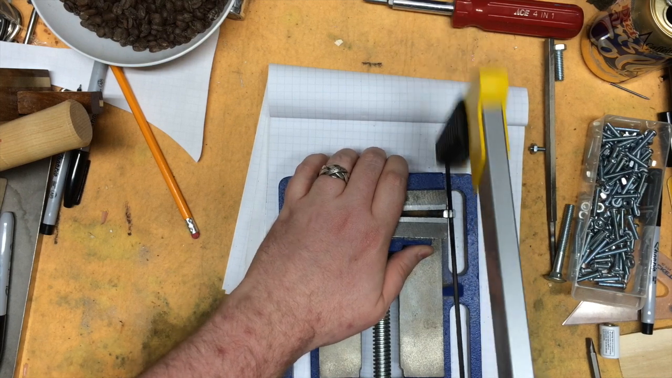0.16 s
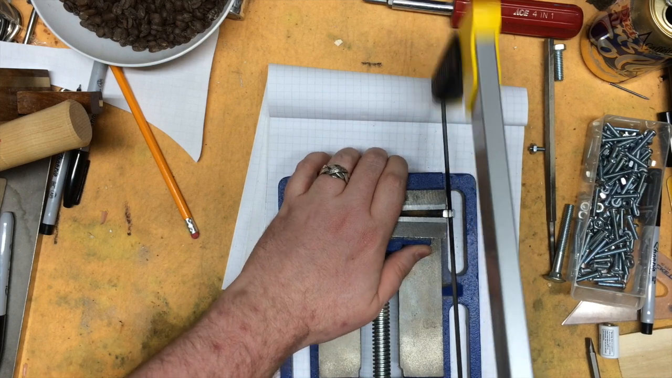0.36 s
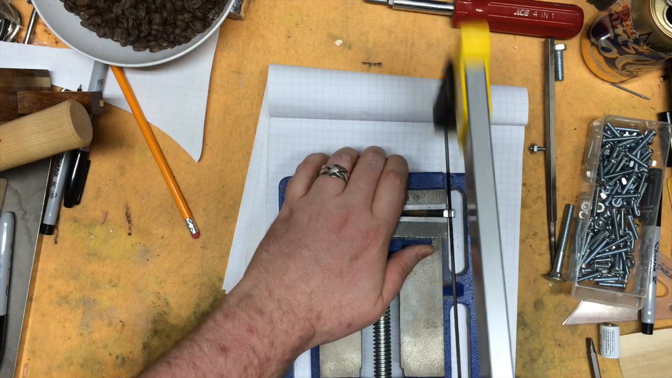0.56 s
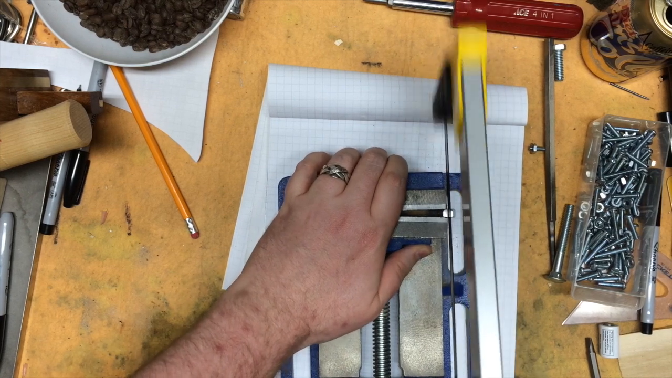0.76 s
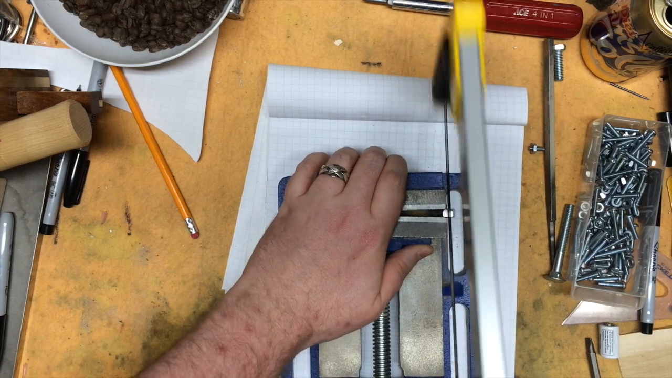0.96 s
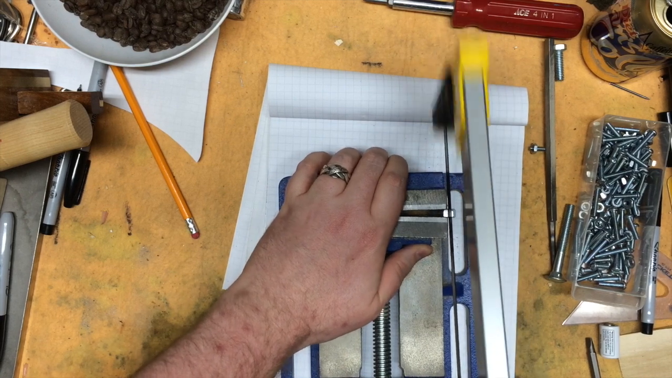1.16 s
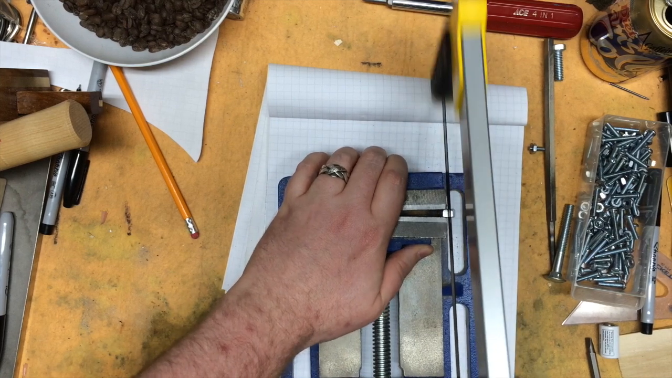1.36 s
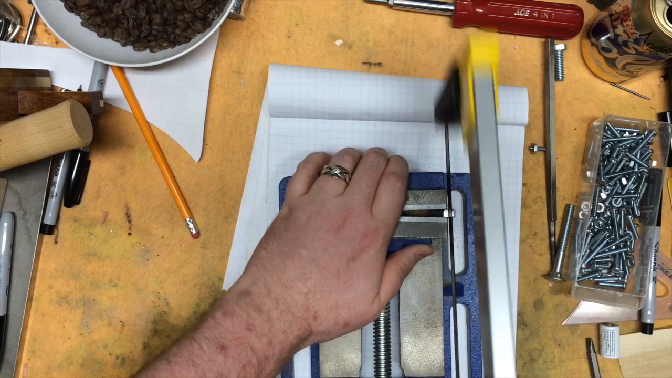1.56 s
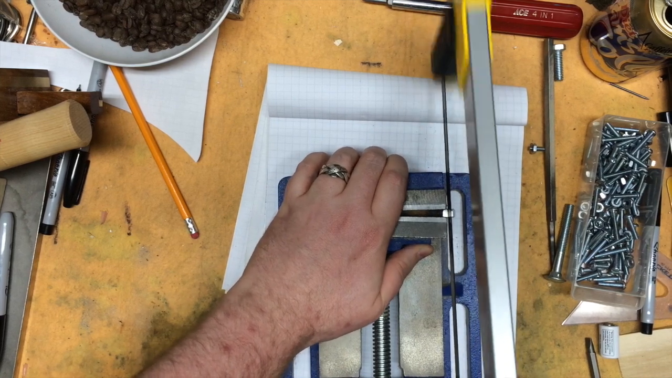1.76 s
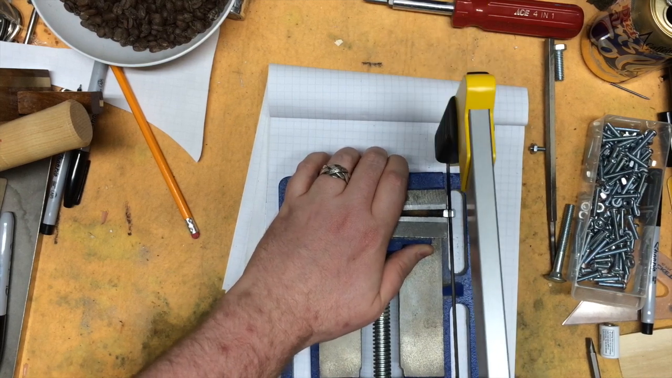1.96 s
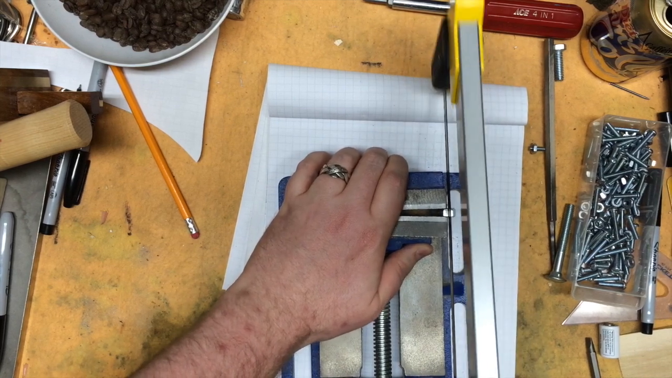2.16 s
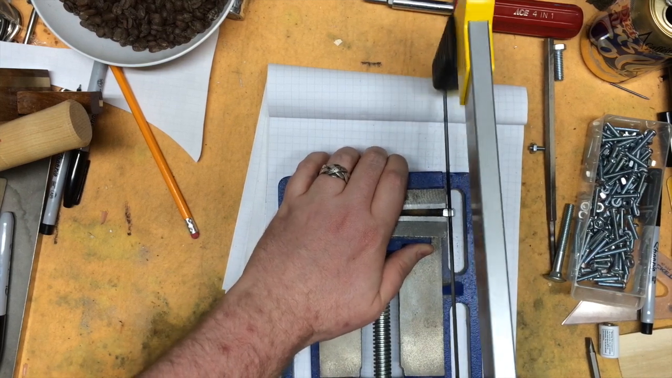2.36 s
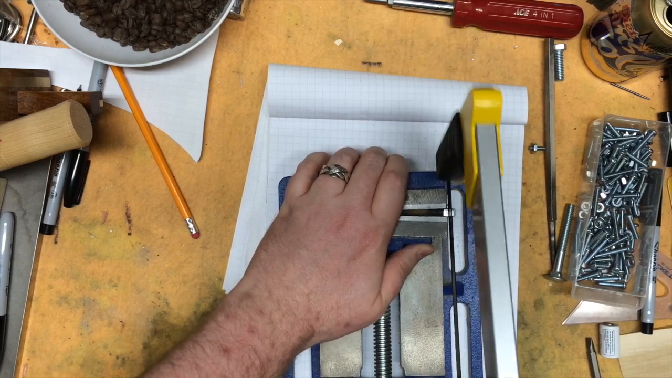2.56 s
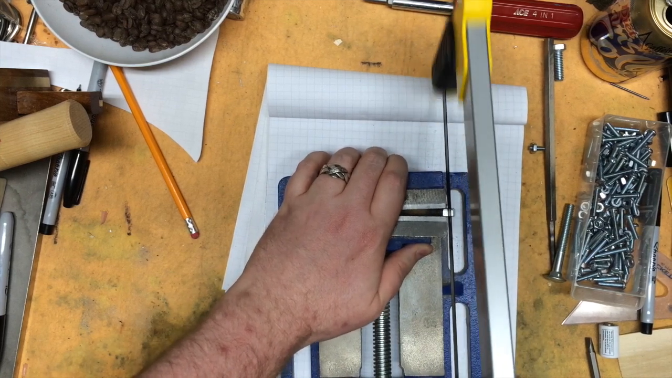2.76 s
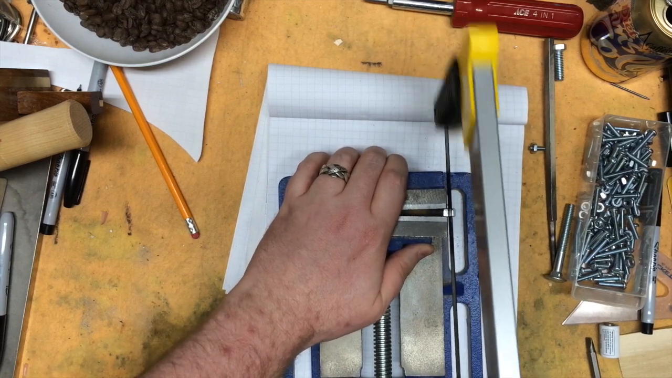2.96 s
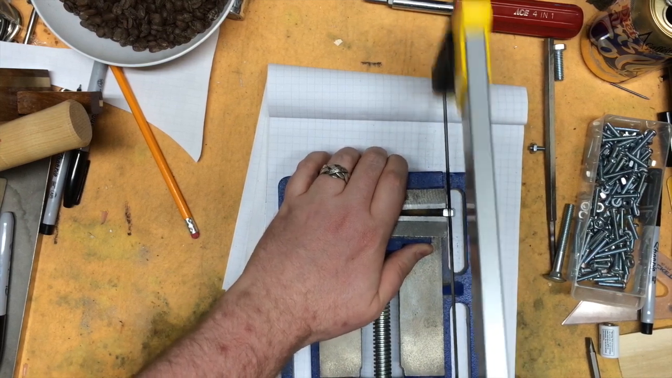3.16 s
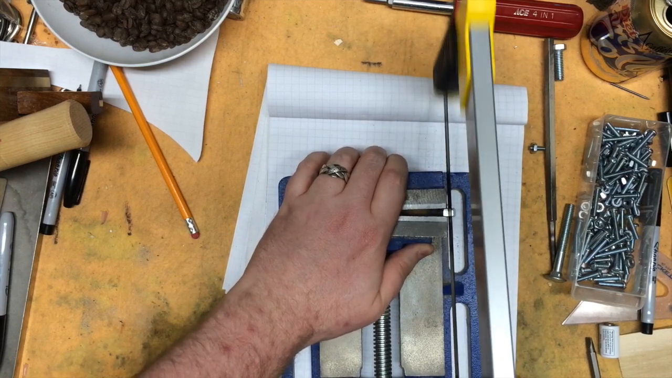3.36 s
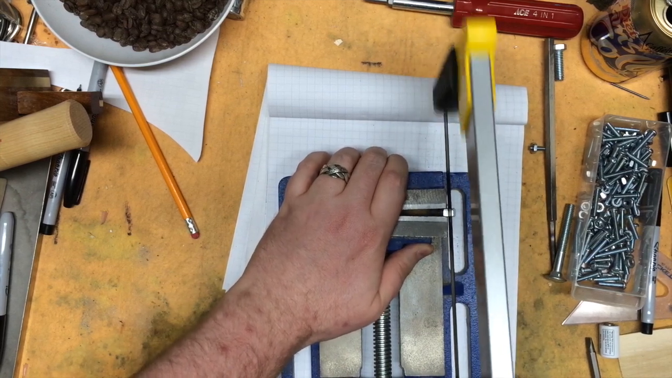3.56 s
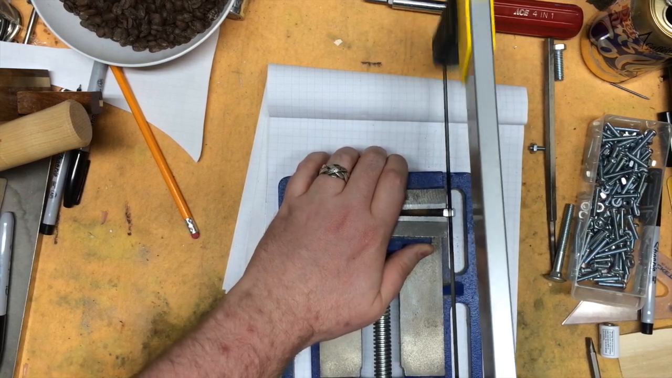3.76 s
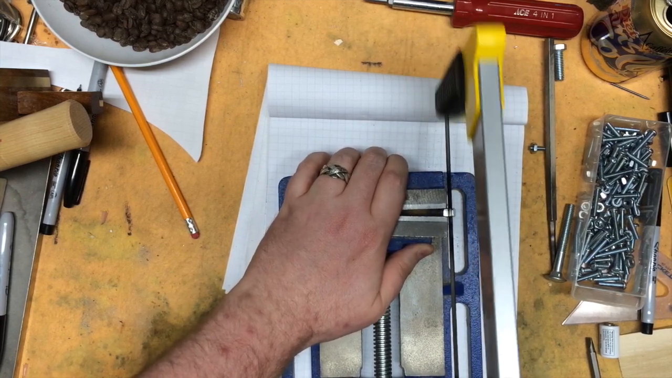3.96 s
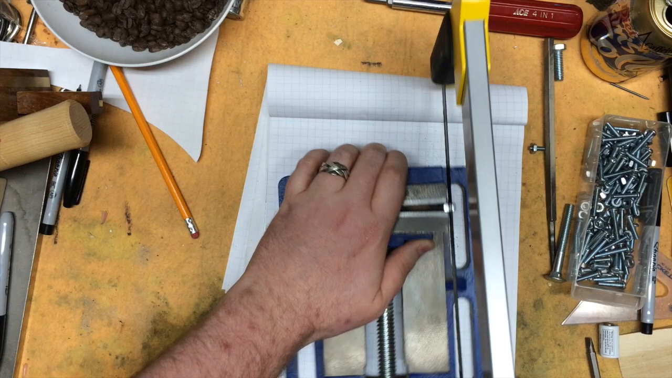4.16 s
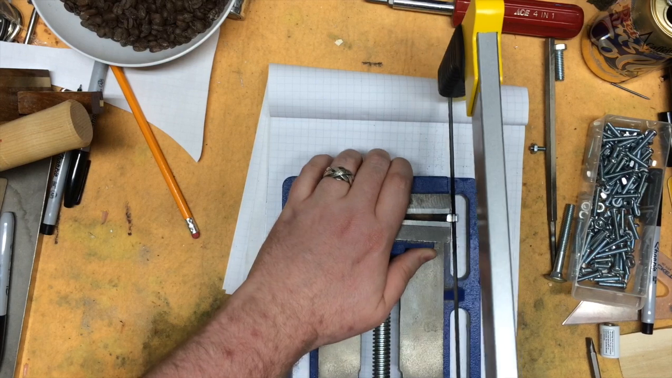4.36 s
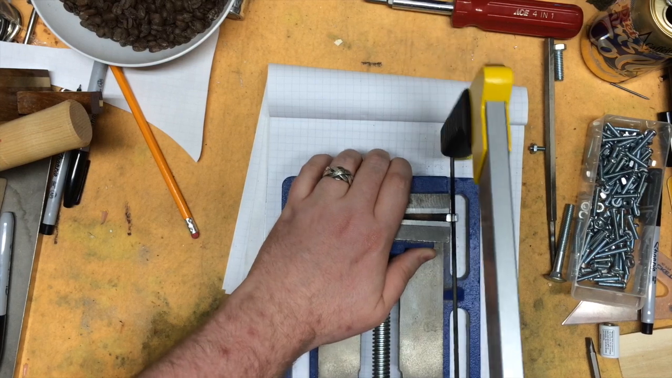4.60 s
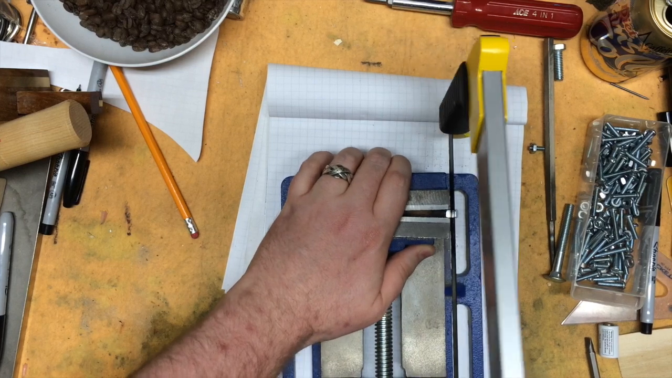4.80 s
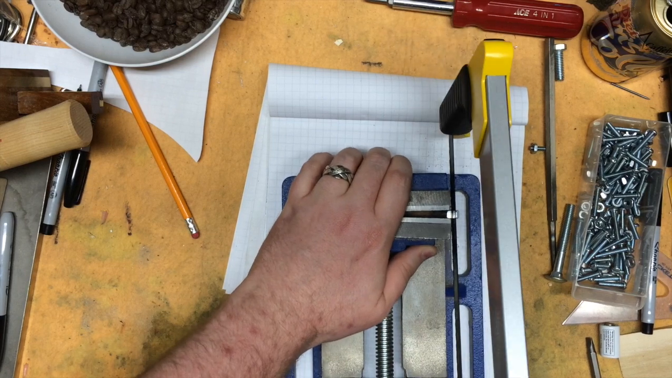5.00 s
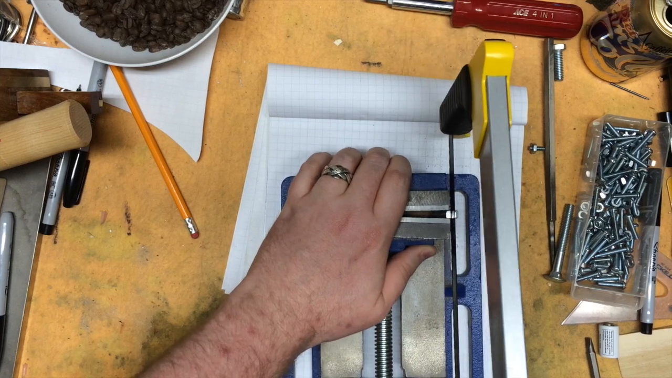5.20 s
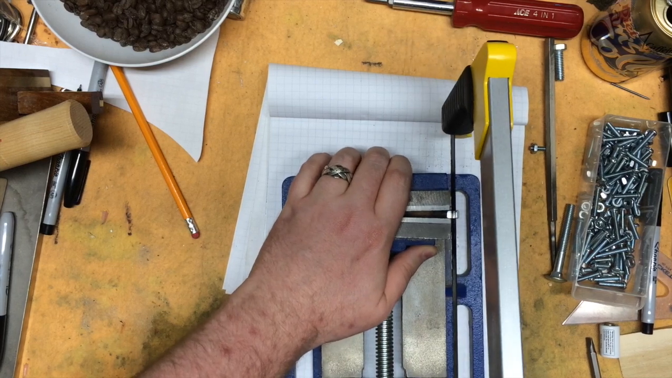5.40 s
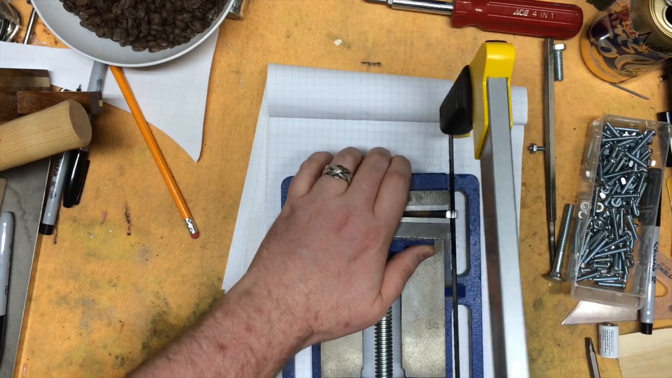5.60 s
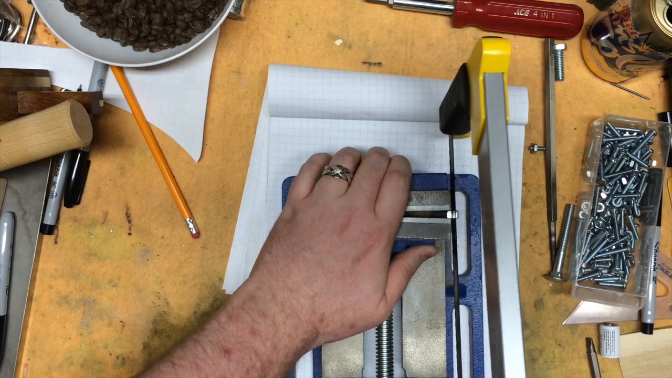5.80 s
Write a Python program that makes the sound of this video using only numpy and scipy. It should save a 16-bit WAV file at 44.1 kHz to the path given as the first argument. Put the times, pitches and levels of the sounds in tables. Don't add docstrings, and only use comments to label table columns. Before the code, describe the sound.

Fast back-and-forth metal sawing, bright and gritty with gliding ringing tones and low bench thuds, ends with a knock, blade chatter and faint taps.

```python
import sys
import numpy as np
from scipy import signal
from scipy.fft import rfft, irfft, next_fast_len
from scipy.io import wavfile
from scipy.ndimage import uniform_filter1d

SR = 44100
rng = np.random.default_rng(int(sys.argv[2]) if len(sys.argv) > 2 else 0)


def materialize(psi):
    bounded = np.clip(np.atleast_2d(psi).T, -1, 1)
    quanta = np.round(bounded * 32767).astype(np.int16)
    wavfile.write(sys.argv[1], SR, quanta)


def amplitude_ratio(level_db):
    exponent = np.asarray(level_db, float) / 20
    return 10 ** exponent


N = 257499


def evened(x):
    return x / np.sqrt(np.mean(x ** 2) + 1e-20)


def steadied(x, share=.6):
    slow_power = uniform_filter1d(x ** 2, size=1300) + 0.017
    return evened(x / slow_power ** (share / 2))


def noise():
    return rng.standard_normal(N)


def seconds():
    return np.arange(N) / SR


def read(points, hz):
    f, value = np.transpose(points)
    return np.interp(np.log(hz + 1), np.log(f + 1), value)


def add(mix, start_s, sound):
    part = mix[max(round(start_s * SR), 0):][:len(sound)]
    part += sound[:len(part)]


def resonate(x, hz, width):
    r = np.exp(-np.pi * width / SR)
    if np.ndim(hz) == 0:
        return 2 * signal.lfilter([1 - r], [1, -r * np.exp(2j * np.pi * hz / SR)], x).real
    turn = np.exp(2j * np.pi * np.cumsum(hz) / SR)
    return 2 * (turn * signal.lfilter([1 - r], [1, -r], x / turn)).real


def ring(x, modes):
    total = 0
    for hz, width, db in modes:
        total = total + amplitude_ratio(db) * evened(resonate(resonate(x, hz, width), hz, 3 * width))
    return evened(total)


def colour(x, points):
    size = next_fast_len(len(x))
    gain = amplitude_ratio(read(points, np.fft.rfftfreq(size, 1 / SR)))
    return irfft(rfft(x, size) * gain, size)[:len(x)]


def flutter(hz):
    slow = signal.butter(N=2, Wn=hz, fs=SR / 16, output="sos")
    coarse = signal.sosfilt(slow, rng.standard_normal(N // 16 + 2))
    return evened(np.interp(np.arange(N) / 16, np.arange(len(coarse)), coarse))


def ping(db, hz, rise, t60):
    t = np.arange(round(.6 * SR)) / SR
    fade = amplitude_ratio(db - 60 * t / max(t60, .005))
    return fade * np.sin(2 * np.pi * hz * t) * (1 - np.exp(-t / max(rise, 1e-4)))


def swell(t, s, db, rise, fall):
    return amplitude_ratio(db - np.where(t < s, rise * (s - t), fall * (t - s)))


def held(t, rows, rise, sag, fall):
    total = 0
    for s, length, db in rows:
        total = total + swell(t, s, db, rise, sag) * swell(t, s + length, 0, 0, fall - sag)
    return total


# [teeth_bite_s, hardest_s, let_go_s, effort_db, run_up_s]
STROKES = [(0.0, 0, 0.044, -45, 0.03), (0.12, 0.193, 0.273, -34.5, 0.038), (0.374, 0.445, 0.487, -36, 0.06),
           (0.583, 0.6, 0.714, -35, 0.011), (0.837, 0.879, 0.92, -32.5, 0.083),
           (1.023, 1.045, 1.131, -32.5, 0.036), (1.229, 1.281, 1.335, -34, 0.048),
           (1.419, 1.463, 1.542, -34.5, 0.027), (1.648, 1.692, 1.752, -32.5, 0.089),
           (1.838, 1.894, 1.99, -34.5, 0.035), (2.115, 2.212, 2.255, -38.5, 0.056),
           (2.477, 2.548, 2.678, -38, 0.033), (2.728, 2.837, 2.877, -35.5, 0.035),
           (2.98, 3.03, 3.095, -37, 0.034), (3.211, 3.26, 3.32, -33.5, 0.073),
           (3.401, 3.476, 3.526, -38.5, 0.032), (3.651, 3.705, 3.761, -35, 0.064),
           (3.859, 3.88, 3.957, -35.5, 0.032), (4.068, 4.09, 4.182, -32.5, 0.046),
           (4.256, 4.31, 4.326, -43.5, 0.04), (4.512, 4.531, 4.69, -38, 0.025),
           (4.801, 4.82, 4.845, -29.5, 0.014)]
# [start_s, length_s, level_db]
VISE_RINGS = [(0.224, 0.047, -50.5), (0.38, 0.03, -52.5), (0.527, 0.008, -65.8), (0.662, 0.047, -46.5),
              (0.818, 0.0, -49.5), (1.082, 0.058, -50), (1.245, 0.052, -37.5), (1.532, 0.0011, -43.5),
              (1.635, 0.038, -46.5), (1.722, 0.031, -61), (1.952, 0.044, -46.5), (2.1, 0.12, -54.5),
              (2.54, 0.12, -41.5), (2.74, 0.068, -44.5), (3.052, 0.032, -51), (3.193, 0, -50),
              (3.467, 0.091, -56.9), (3.646, 0, -55.4), (3.935, 0.014, -51.5), (4.086, 0.037, -44),
              (4.292, 0.012, -46), (4.544, 0.12, -53)]
# [start_s, length_s, level_db]
FRAME_RINGS = [(0.016, 0.011, -51), (0.14, 0.02, -40), (0.391, 0.094, -43), (0.601, 0.002, -40.5),
               (0.82, 0.0091, -52.5), (0.878, 0.028, -41), (1.03, 0.018, -43.5), (1.219, 0.02, -48.5),
               (1.293, 0.024, -44), (1.419, 0.136, -50.5), (1.692, 0.056, -33.5), (1.848, 0.006, -43.5),
               (1.906, 0.004, -48.5), (2.131, 0.11, -46.5), (2.496, 0.19, -49.5), (2.75, 0.134, -38.5),
               (2.836, 0.024, -44), (2.985, 0.002, -48.5), (3.055, 0.004, -54), (3.095, 0.002, -45.5),
               (3.22, 0.11, -38.5), (3.422, 0.056, -41.5), (3.66, 0.12, -38), (3.709, 0.0022, -34),
               (3.875, 0.046, -41.5), (4.087, 0.02, -28.5), (4.528, 0.039, -54), (4.614, 0.053, -51)]
# [time_s, level_db]
LEAN = [
    (0, 2.5),
    (.75, 1),
    (1.3, 0),
    (2.1, 1.5),
    (2.6, -4.5),
    (3.3, -2.5),
    (4.1, -0.5),
    (4.3, -9),
    (4.6, -1.5),
]
# [time_s, foot_db, bench_top_db]
SKIDS = [
    (1.75, -37, -68.5),
    (2.11, -65.5, -46),
    (2.74, -44, -35.5),
    (2.755, -63, -39.5),
    (3.76, -48, -65),
    (4.111, -36.5, -50.5),
    (4.282, -40, -72),
    (4.81, -56, -47.5),
]


def arm():
    t = np.arange(0, N + 64, 64) / SR
    bite_db, run_up_db = -6, 25.5
    let_go_db, lift_db_per_s = -8.5, 476.5
    scrape = np.full(len(t), 1e-7)
    for bite, hardest, go, db, run_up in STROKES:
        times = [bite - 8 * run_up, bite, hardest, go, go + 1]
        levels = [bite_db - 8 * run_up_db, bite_db, 0, let_go_db, let_go_db - lift_db_per_s]
        cut = amplitude_ratio(np.interp(t, times, levels))
        drag_db, drag_db_per_s = (-17, 145) if go >= STROKES[-2][2] else (-25, 110)
        drag = swell(t, go, drag_db, 0, drag_db_per_s) * (t > go)
        scrape += amplitude_ratio(db) * np.maximum(cut, drag)
    vise = scrape * amplitude_ratio(-27.5) + held(t, VISE_RINGS, rise=501, sag=62.5, fall=449.5)
    frame_ring = scrape * amplitude_ratio(-21) + held(t, FRAME_RINGS, rise=750, sag=60, fall=600)
    effort = uniform_filter1d(scrape, size=70) / amplitude_ratio(-38)
    shake = amplitude_ratio(-44.5 + np.interp(t, *np.transpose(LEAN))) * effort ** 0.4
    rattle = amplitude_ratio(-56) * (scrape / amplitude_ratio(-40.5)) ** 0.26
    for s, foot_db, top_db in SKIDS:
        shake = shake + swell(t, s, top_db, rise=250, fall=133.5)
        rattle = rattle + swell(t, s, foot_db, rise=353.5, fall=353.5)
    stroke_times = np.ravel([(row[0], row[2]) for row in STROKES])
    pushing = np.repeat(1 - np.arange(len(STROKES)) % 2, 2)
    push = np.interp(t, stroke_times, pushing)
    curves = [np.interp(seconds(), t, 20 * np.log10(abs(c) + 1e-9))
              for c in (scrape, vise, frame_ring, shake, rattle)]
    return curves, np.interp(seconds(), t, push)


SPAN_DB = [-77, -72, -54, -71, -46.5, -49, -48.5, -74, -47.5, -49.5, -46.5, -52.5, -42, -56, -43.5, -76,
           -46, -67, -47.5, -55, -67, -80]


def span(early_s=.015, late_s=.01):
    gain, starts, ends = np.zeros(N), [], []
    for k, (bite, hardest, go, _, _) in enumerate(STROKES):
        pulling = k % 2
        last = go if pulling else min(go, hardest + .05)
        start, end = bite - early_s, last + late_s
        add(gain, start, amplitude_ratio(SPAN_DB[k]) * signal.windows.tukey(round((end - start) * SR), .7))
        starts.append(start)
        ends.append(end)
    push_then_pull_hz = (771.6, 1179, 1003.5, 744.5)
    glide_hz = np.resize(push_then_pull_hz, 2 * len(STROKES))
    return np.interp(seconds(), np.ravel([starts, ends], "F"), glide_hz), gain


def teeth(hz, jitter=.05, uneven_db=4):
    turns = np.cumsum(hz * (1 + jitter * flutter(300))) / SR
    ticks = np.diff(np.floor(turns), prepend=0)
    return evened(ticks * amplitude_ratio(uneven_db * noise()))


def patchy(x, narrow_db, wide_db):
    z = signal.stft(x, nperseg=1024, noverlap=768)[2]
    thin, broad = rng.standard_normal((z.shape[1], z.shape[0], 2)).T
    thin = evened(uniform_filter1d(uniform_filter1d(thin, size=2, axis=0), size=9, axis=1))
    broad = evened(uniform_filter1d(uniform_filter1d(broad, size=14, axis=0), size=6, axis=1))
    z = z * amplitude_ratio(narrow_db * thin + wide_db * broad)
    return signal.istft(z, nperseg=1024, noverlap=768)[1][:N]


# [pitch_hz, level_db]
SCRAPE = [(150, -45), (250, -36.5), (553, -14), (742, -15.5), (809, -2), (1080, -5), (1530, -7.5),
          (2710, 4.5), (3060, 0), (6310, -9.5), (7510, -10.5), (10600, -21.5), (15500, -21)]
# [pitch_hz, width_hz, pull_db, push_db]
BLADE = [(1390, 32, -20.5, -5.5), (2308, 29, -0.5, -23), (2515, 22, -1.5, -3), (2660, 37, 2.5, 4),
         (3110, 70, -6.5, -17.5), (3237, 20, 6, -12.5), (3510, 90, -10, -11), (3940, 140, -6.5, -20),
         (4170, 79, -5, -6), (4870, 160, -8.5, -25.5), (5636, 74, -13, -15), (5980, 61, -25.5, -19),
         (6900, 56, -12.5, -12), (7334, 180, -10.5, -7.5), (7600, 28, -4.5, -7), (8190, 12, -25.5, -3.5),
         (12600, 140, -28.5, -13.5), (13750, 450, -37.5, -20.5)]
# [time_s, peak_db, ring_hz]
CATCHES = [(0.105, -33, 1106), (0.117, -40, 1170), (0.581, -16.5, 2786), (0.796, -29.5, 3940),
           (0.874, -32, 2760), (1.0045, -27.5, 2661), (1.0251, -14.5, 2405), (1.0644, -31, 3280),
           (1.4043, -33, 2655), (1.429, -17, 2710), (1.6053, -30, 1085), (1.6725, -14, 2681),
           (1.838, -19, 1132), (1.8775, -17.5, 2787), (1.8956, -15, 3260), (2.0963, -29.5, 1094),
           (2.4457, -38.5, 1081), (2.9625, -37, 1135), (3.2377, -21.5, 1050), (3.701, -25, 1115),
           (3.863, -20.5, 2661), (4.0719, -14, 1119), (4.092, -20, 1078), (4.1324, -22, 3487),
           (4.1729, -21, 2660), (4.5099, -40, 2690), (4.8036, -21, 3500), (4.8153, -26, 2620),
           (4.9119, -30.5, 2660)]
# [time_s, treble_db, ringing_db]
BITE = [
    (0, 1, 3.5),
    (1.2, 1, 7.5),
    (2.2, 0, 1.7),
    (3.2, 1, 3),
    (3.9, -6.5, 2),
    (4.18, -4, -1.5),
    (4.29, 10, 6),
    (4.601, -3.5, -5.5),
    (4.95, -6.5, -4),
]


def blade(scrape_db, teeth_hz, push):
    chips = noise() * amplitude_ratio(0.5 * flutter(420) + 0.81 * flutter(40))
    drive = evened(chips) + 0.19 * teeth(teeth_hz)
    broad = amplitude_ratio(-2) * evened(patchy(colour(drive, SCRAPE), narrow_db=3.6, wide_db=1.7))
    force, rings = amplitude_ratio(scrape_db) * drive, np.zeros(N)
    for s, db, hz in CATCHES:
        burst_fade = amplitude_ratio(db - 14 - 60 * np.arange(1500) / SR / 0.013)
        add(force, s, burst_fade * rng.standard_normal(1500))
        add(rings, s, ping(db - 8, hz, rise=0.0015, t60=0.054))
    modes = np.zeros(N)
    for hz, width, pull_db, push_db in BLADE:
        mode_db = pull_db + (push_db - pull_db) * push + 3.0 * flutter(20)
        level = amplitude_ratio(mode_db) * np.sqrt(width / 40)
        modes += level * resonate(force, hz, width) * np.sqrt(SR / width / np.pi / 2)
    s, treble_db, ringing_db = np.transpose(BITE)
    treble_db = np.interp(seconds(), s, treble_db)
    ringing_db = np.interp(seconds(), s, ringing_db)
    loudness = np.sqrt(abs(uniform_filter1d(force ** 2, size=120)))
    steel = amplitude_ratio(ringing_db - 16) * modes + broad * loudness
    treble = colour(steel, [(6000, -27.5), (10000, -8.0)])
    return rings + steel + treble * (amplitude_ratio(treble_db) - 1)


# [pitch_hz, width_hz, level_db]
VISE = [(730.4, 40, 13.5), (751.7, 13, 9)]
# [pitch_hz, width_hz, level_db]
FRAME = [(1109.8, 32.4, 28.5), (1153, 120, 4.5), (1040, 50, 2.5), (970, 34, -9.5)]
# [multiple, width_hz, level_db]
SPAN_ORDERS = [(1, 65, 1), (.8, 39, -12.5), (3.4, 119, -18), (4.6, 160, -21.5)]


def frame(vise_db, frame_db, span_hz, span_gain):
    drive = 0.22 * teeth(span_hz) + noise()
    glide = 0
    for multiple, width, db in SPAN_ORDERS:
        hz = multiple * span_hz
        tone = steadied(resonate(resonate(drive, hz, width), hz, width))
        glide = glide + amplitude_ratio(db + 2.5 * flutter(29)) * tone
    vise = steadied(ring(drive, VISE)) * amplitude_ratio(vise_db + 2 * flutter(30))
    frame_ring = steadied(ring(drive, FRAME)) * amplitude_ratio(frame_db + 2 * flutter(27))
    return vise + frame_ring + glide * span_gain


# [pitch_hz, width_hz, level_db]
BENCH = [(66.18, 19, 1.5), (95.2, 11, 2), (119.9, 13.6, 7.5), (168.4, 22.2, 5), (187.4, 17, -4.5)]
# [pitch_hz, width_hz, level_db]
FOOT = [(260.5, 97, 0), (343.5, 190, -3.5), (504, 180, -1)]
# [time_s, peak_db, pitch_hz, t60_s]
THUMPS = [(0.147, -35, 112.5, 0.21), (0.277, -37.5, 220, 0.24), (0.373, -25, 123.4, 0.12),
          (0.585, -23, 124, 0.047), (0.728, -27.5, 202, 0.094), (0.773, -29.5, 143.6, 0.5),
          (1.017, -37, 124, 0.36), (1.149, -29.5, 189, 0.21), (1.193, -19.5, 131.7, 0.24),
          (1.331, -27.5, 191.5, 0.078), (1.55, -24, 169.7, 0.12), (1.595, -17.5, 133.7, 0.17),
          (1.74, -37, 194, 0.19), (1.992, -24.5, 170, 0.11), (2.075, -18.5, 119.9, 0.22),
          (2.222, -36, 183, 0.2), (2.651, -27, 146.3, 0.16), (2.708, -13, 127.5, 0.13),
          (2.862, -29, 118.1, 0.1), (3.158, -27, 121.9, 0.28), (3.605, -31.5, 120.3, 0.2),
          (3.753, -32.5, 149.7, 0.13), (4.032, -25.5, 130, 0.14), (4.103, -34, 132, 0.15),
          (4.269, -45, 135, 0.24), (4.699, -32, 125.1, 0.22), (4.724, -23.5, 123.3, 0.15),
          (4.803, -33, 186, 0.12)]


def bench(shake_db, rattle_db):
    booms, jolt = np.zeros(N), amplitude_ratio(shake_db - 0.5 + 3.73 * flutter(11.8))
    rise_s = .006
    for s, db, hz, t60 in THUMPS:
        add(booms, s, ping(db + 3.0, hz, rise_s, t60))
        add(booms, s, ping(db - 9.5, 1.515 * hz, rise_s, 0.34 * t60))
        add(jolt, s, abs(ping(db - 10, hz, 2 * rise_s, t60)))
    foot = ring(noise(), FOOT) * amplitude_ratio(rattle_db - 8.0 + 2.0 * flutter(21))
    return booms + uniform_filter1d(jolt, size=360) * ring(noise(), BENCH) + foot


# [pitch_hz, t60_s]
ROOM = [(200, 0.2), (1000, 0.49), (4000, 0.2), (12000, 0.11)]


def room(x):
    taps = np.zeros(SR // 2)
    at = np.arange(300, len(taps) - 20, 20)
    taps[at + rng.integers(0, 20, len(at))] = rng.choice([-1., 1.], len(at))
    hz, t, z = signal.stft(taps, SR, nperseg=256)
    fade = amplitude_ratio(-60 * t / read(ROOM, hz)[:, None])
    tail = signal.istft(z * fade, SR, nperseg=256)[1]
    return signal.fftconvolve(x, tail / np.linalg.norm(tail))[:N]


# [pitch_hz, level_db]
AIR = [(15, -24), (25, -4.5), (133, 3.5), (188, -4.5), (359, -9.5), (509, -11), (582, -13), (722, -16.5),
       (7700, -29), (9050, -28.5), (9810, -32), (10900, -25.5), (15500, -37.5)]
# [pitch_hz, width_hz, level_db]
HUM = [(62.4, 7.4, -72.5), (124, 6.6, -65), (236.5, 15, -80), (303, 14, -82.5), (9240, 250, -95),
       (11000, 90, -89.5)]


def workshop_air():
    hiss = colour(noise(), AIR)
    highpass = signal.butter(N=4, Wn=300, btype="high", fs=SR, output="sos")
    above = signal.sosfilt(highpass, hiss)
    hum = sum(amplitude_ratio(db) * ring(noise(), [(hz, width, 0)]) for hz, width, db in HUM)
    return amplitude_ratio(-75) * hiss / above.std() + hum


# [pitch_hz, level_db, t60_s]
KNOCK = [(63, -28.5, 0.25), (186, -13.5, 0.061), (1026, -9.5, 0.02), (1445, -34, 0.14), (2760, -39.5, 0.32),
         (3110, -38, 0.15), (3380, -37, 0.27), (3600, -39, .2), (3810, -33.5, 0.13)]
# [time_s, level_db, pitch_hz, rise_s, t60_s]
TAPS = [
    (5.25, -50, 1180, 0.011, 0.1),
    (5.255, -64, 1000, .012, 0.09),
    (5.255, -53.5, 341, 0.016, 0.15),
    (5.654, -51.5, 1170, 0.0014, 0.069),
    (5.652, -60, 840, 0.0019, 0.065),
    (5.66, -57, 320, 0.0095, 0.091),
    (5.788, -61, 8400, .0002, .006),
    (4.679, -44.5, 2680, .04, 0.57),
]


def knocks():
    out = np.zeros(N)
    for hz, db, t60 in KNOCK:
        add(out, 4.806, ping(db, hz, rise=0.0048, t60=t60))
    for s, db, hz, rise, t60 in TAPS:
        add(out, s, ping(db, hz, rise, t60))
    return out * (1 + .5 * flutter(100))


# [time_s, level_db]
CHATTER = [
    (4.7, -39.5),
    (4.733, -39),
    (4.754, -39.5),
    (4.775, -44),
    (4.845, -40),
    (4.866, -38),
    (4.897, -44),
    (4.952, -44.5),
    (4.985, -57),
]
# [pitch_hz, level_db, t60_s]
SLOT = [(2660, -2.5, 0.06), (3640, -11.5, .06), (3050, -13, .04), (2340, -12, .04)]


def chatter():
    out, t = np.zeros(N), np.arange(4000) / SR
    for s, db in CHATTER:
        rasp = evened(colour(rng.standard_normal(len(t)), SCRAPE))
        add(out, s, amplitude_ratio(db - 14 - 60 * t / 0.097) * rasp)
        for hz, mode_db, t60 in SLOT:
            uneven_db = 2.1 * rng.standard_normal()
            add(out, s, ping(db + mode_db + uneven_db, hz, rise=0.0013, t60=t60))
    return out


def scene():
    (scrape_db, vise_db, frame_db, shake_db, rattle_db), push = arm()
    stopped = 1. * (seconds() > 5.12)
    stop_db = -80 * uniform_filter1d(stopped, size=4000)
    span_hz, span_gain = span()
    saw = blade(scrape_db + stop_db, span_hz, push)
    rings = frame(vise_db + stop_db, frame_db + stop_db, span_hz, span_gain) + knocks()
    echo = amplitude_ratio(-17.5) * room(saw + amplitude_ratio(-7.5) * rings)
    wood = bench(shake_db + stop_db, rattle_db + stop_db)
    return (saw + rings + echo + wood + workshop_air() + chatter())[None]


def band_limit(x):
    return signal.sosfilt(signal.butter(12, 16000, fs=SR, output="sos"), x)


def record(dry):
    lowpass = signal.firwin(511, 15350, window=("kaiser", 9), fs=SR)
    mix = signal.oaconvolve(dry, lowpass[None], "same")
    return band_limit(mix)


dry = scene()
out = record(dry)
materialize(out)
```